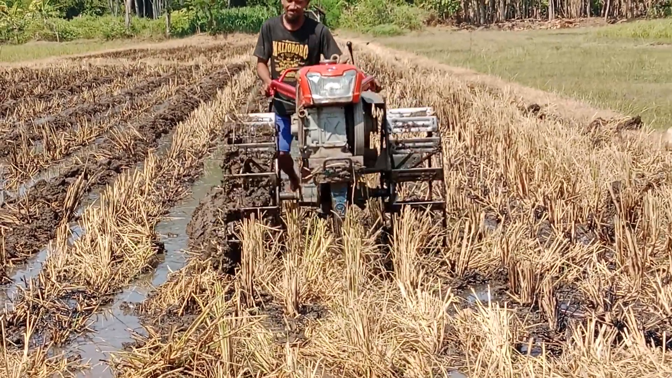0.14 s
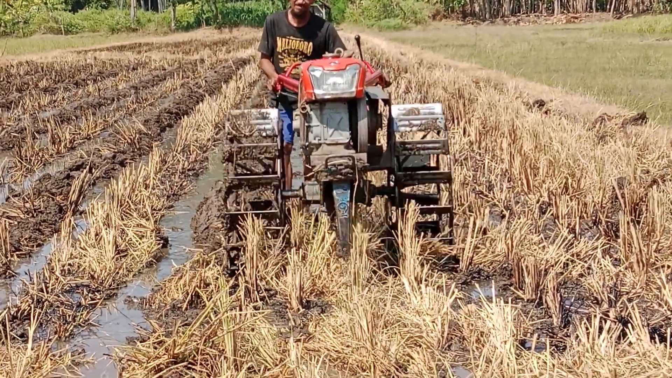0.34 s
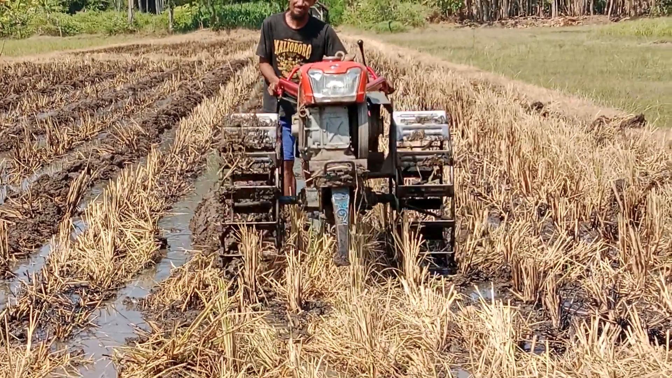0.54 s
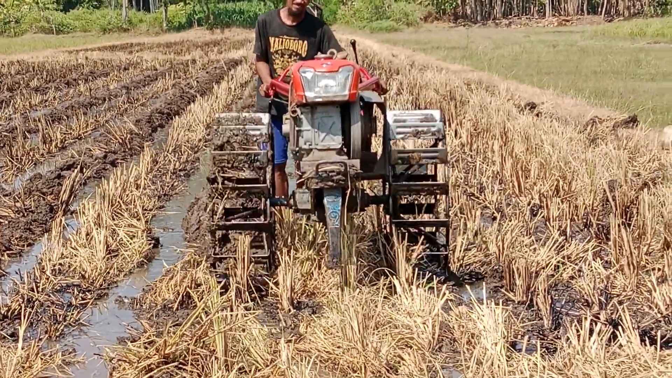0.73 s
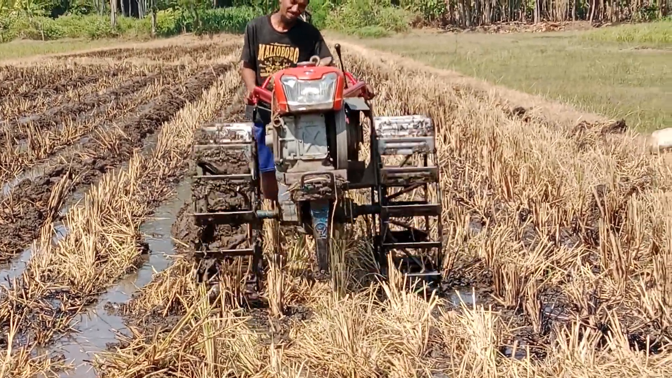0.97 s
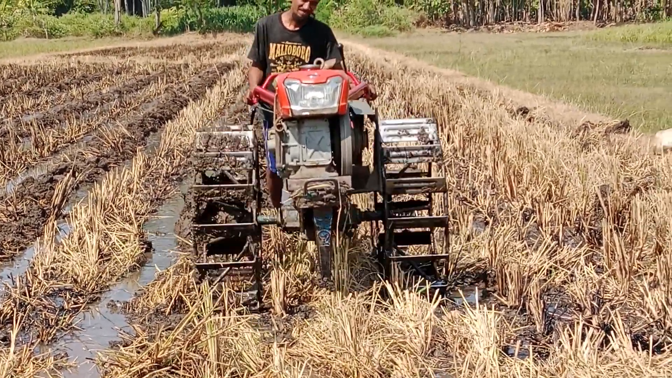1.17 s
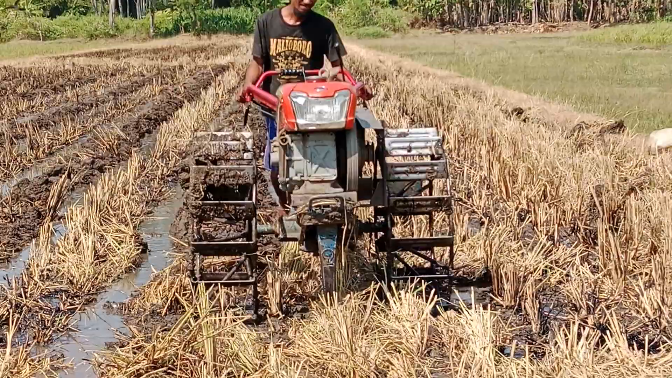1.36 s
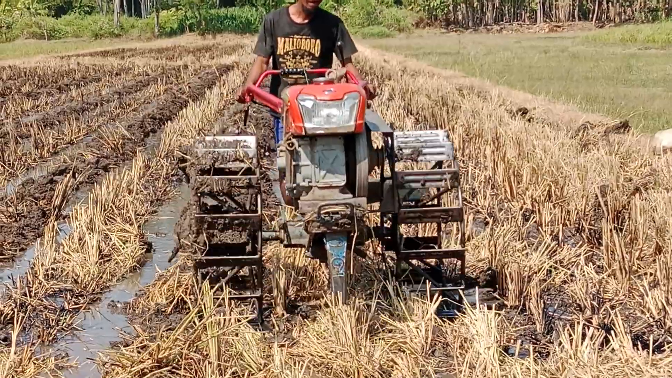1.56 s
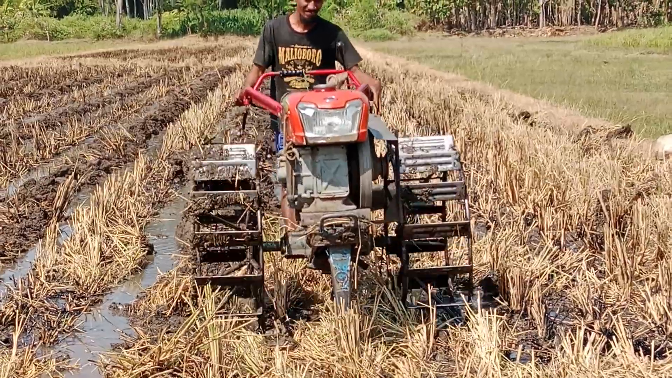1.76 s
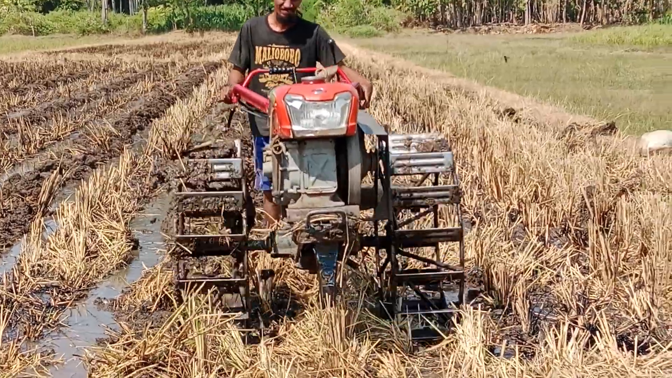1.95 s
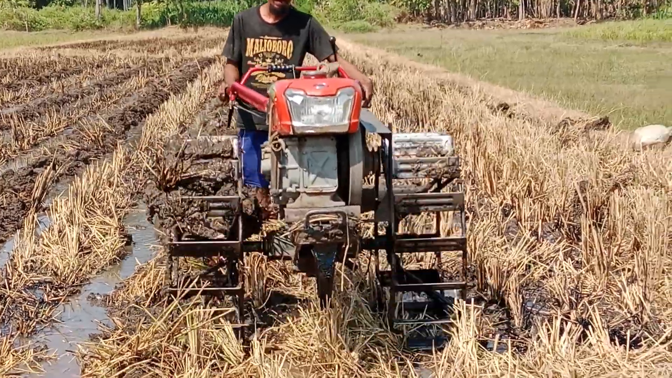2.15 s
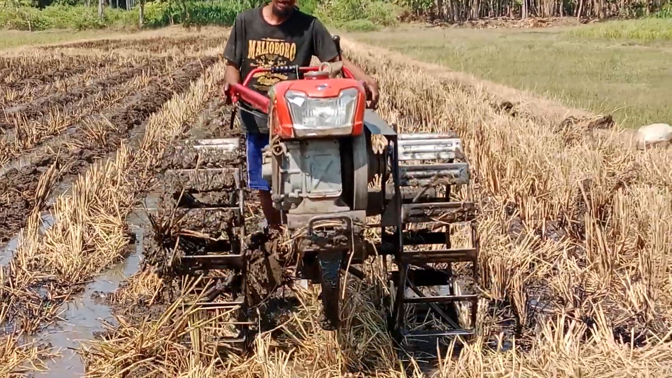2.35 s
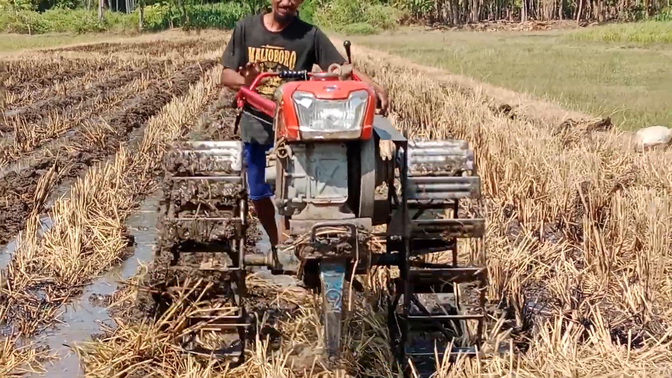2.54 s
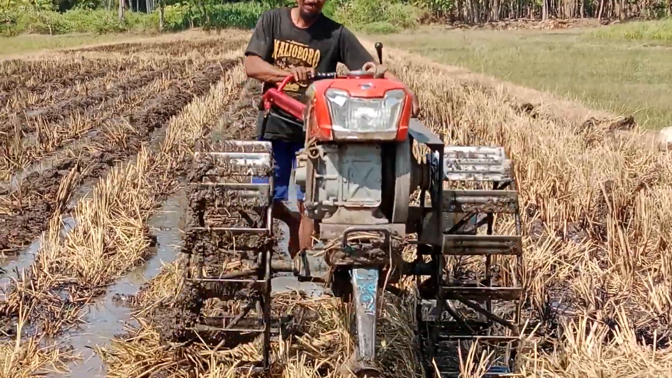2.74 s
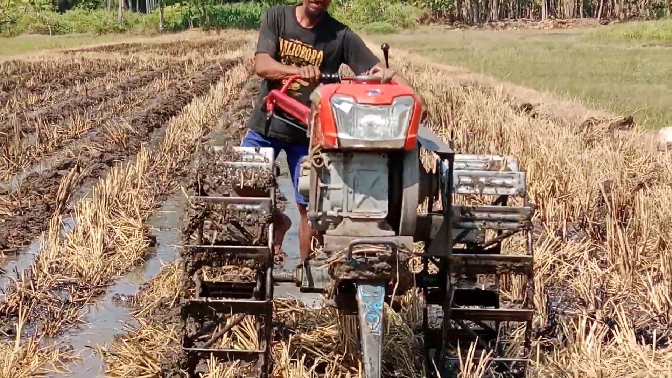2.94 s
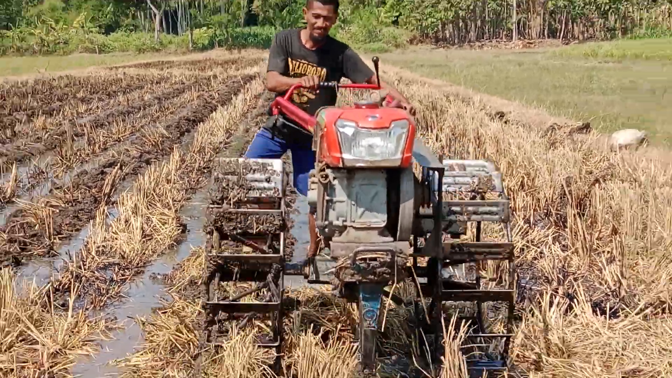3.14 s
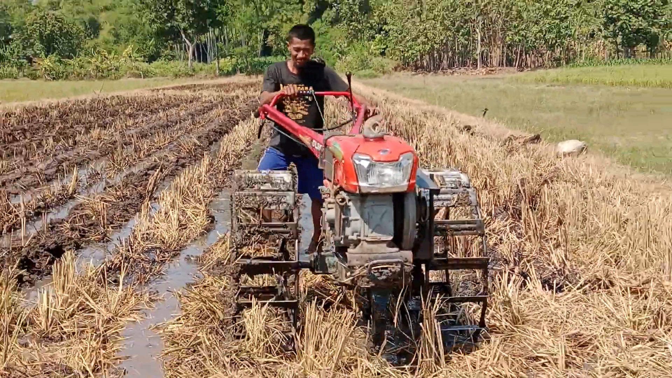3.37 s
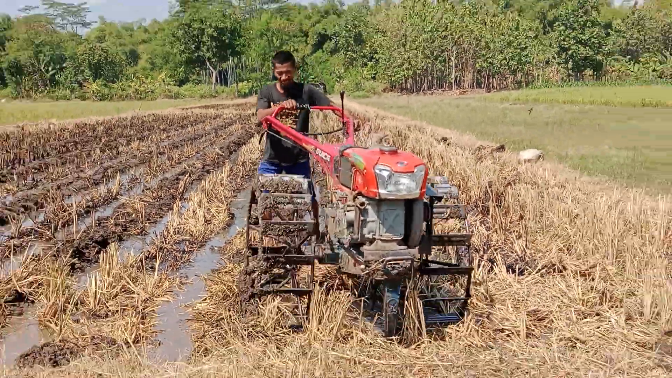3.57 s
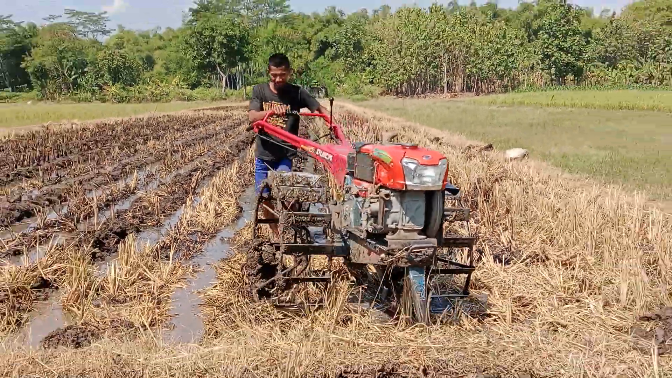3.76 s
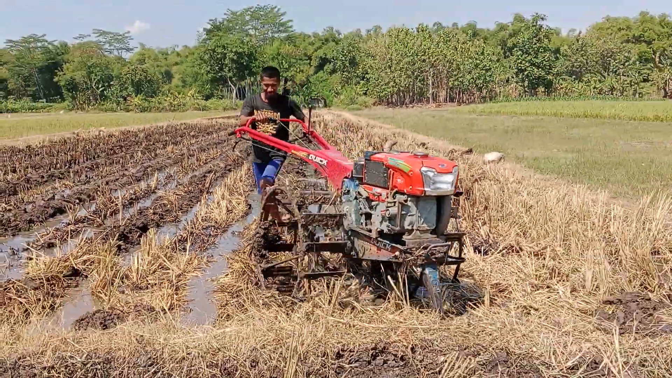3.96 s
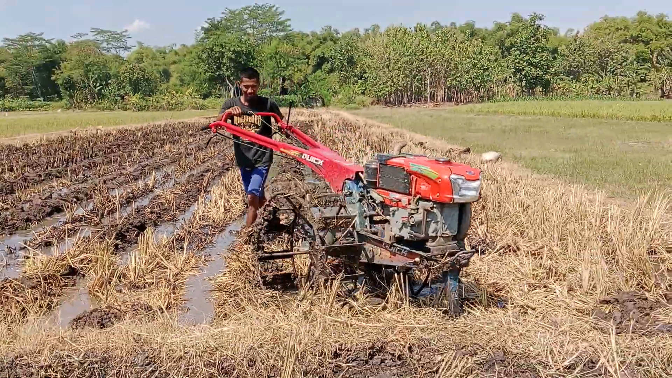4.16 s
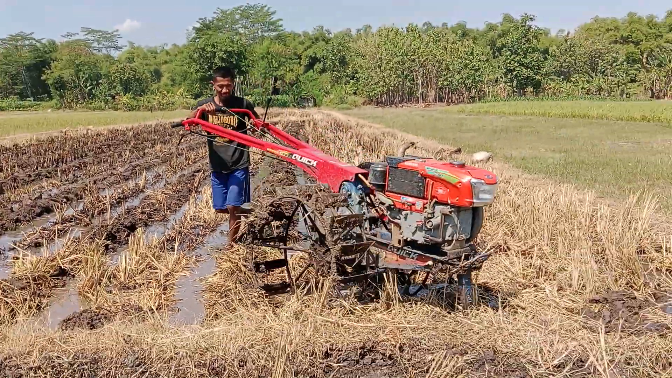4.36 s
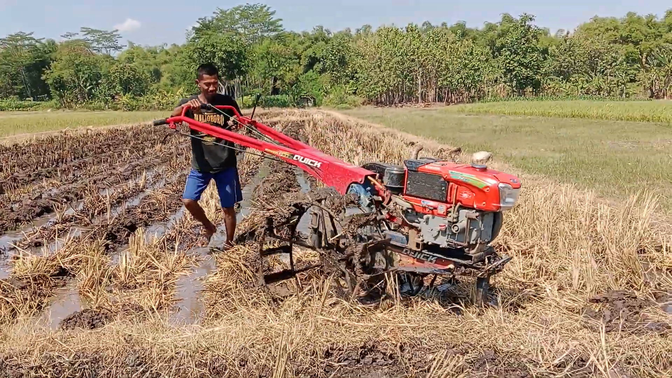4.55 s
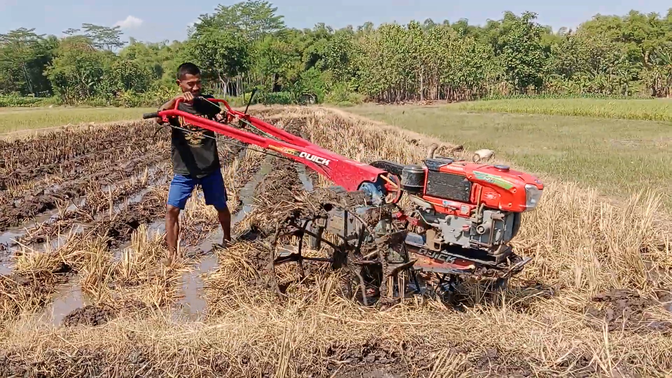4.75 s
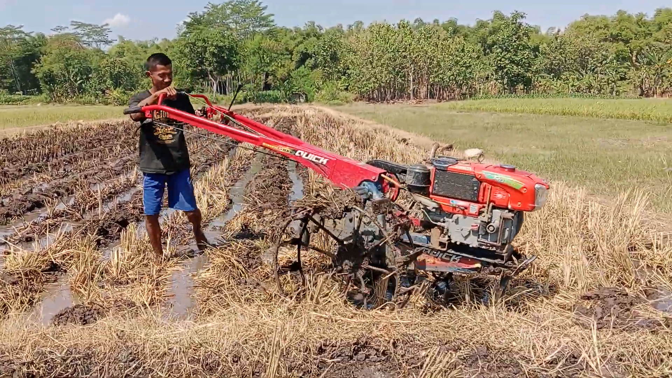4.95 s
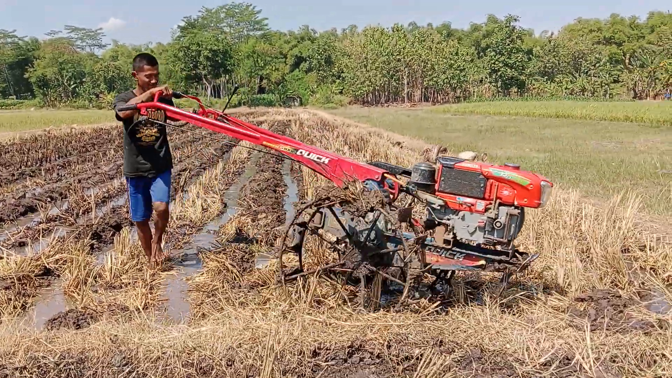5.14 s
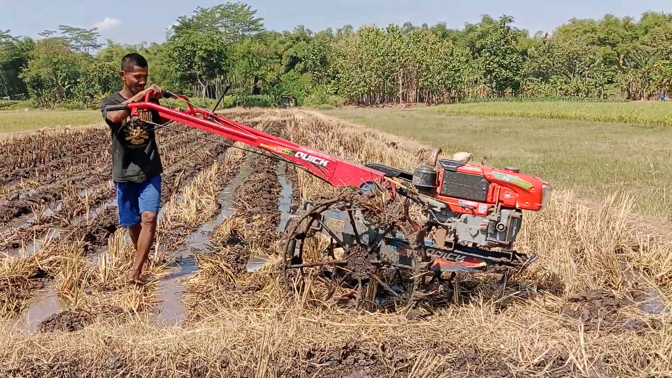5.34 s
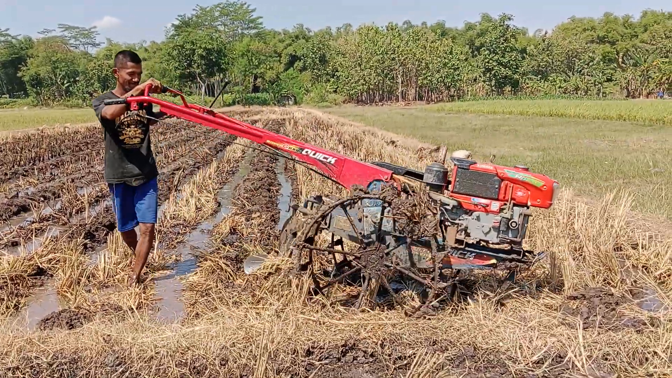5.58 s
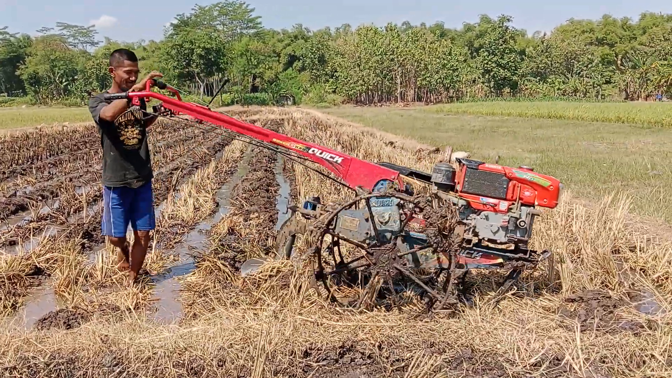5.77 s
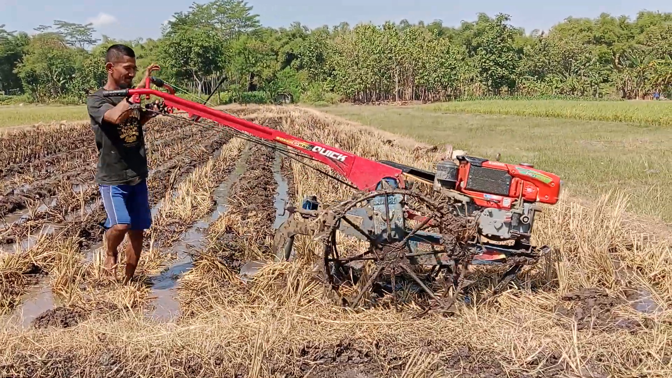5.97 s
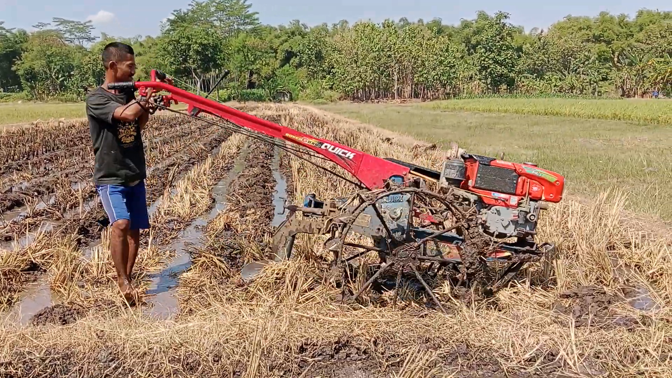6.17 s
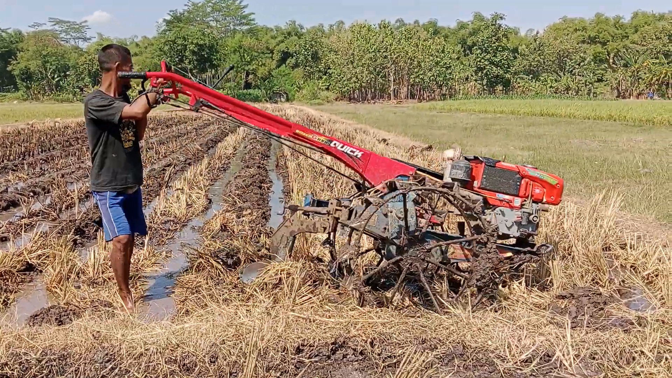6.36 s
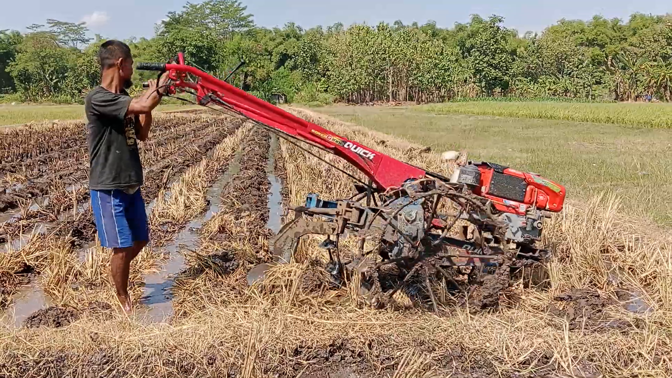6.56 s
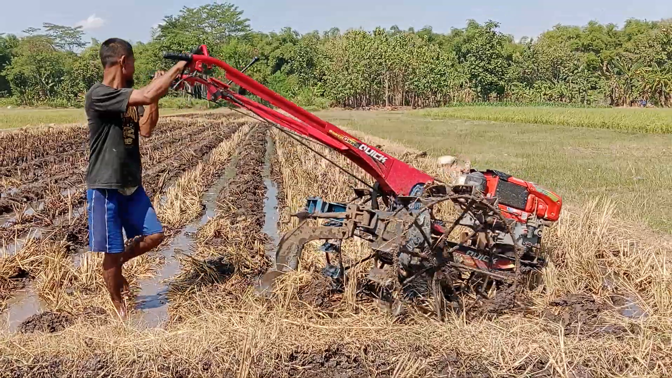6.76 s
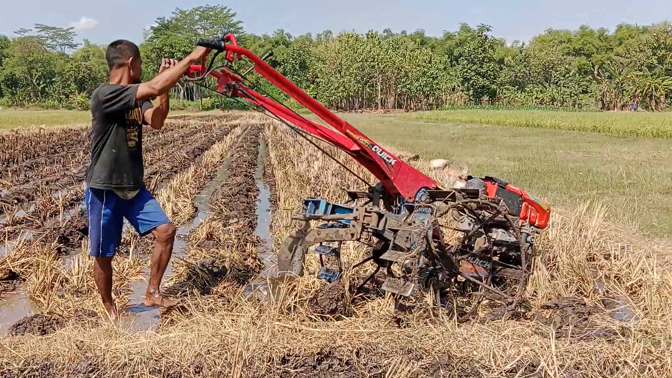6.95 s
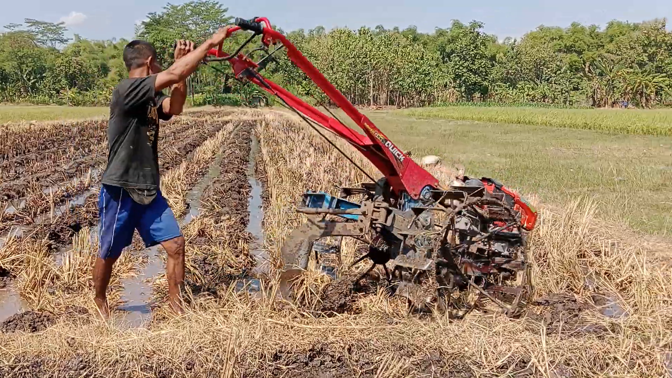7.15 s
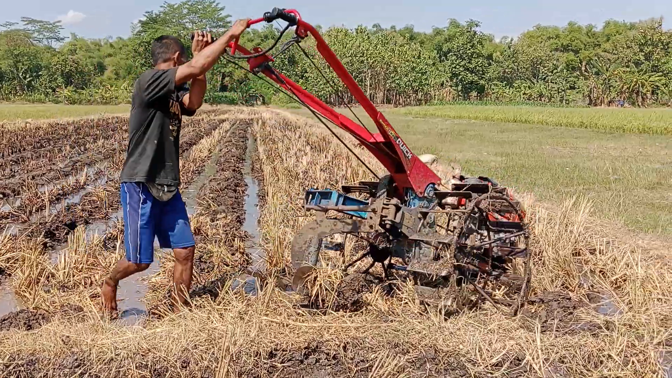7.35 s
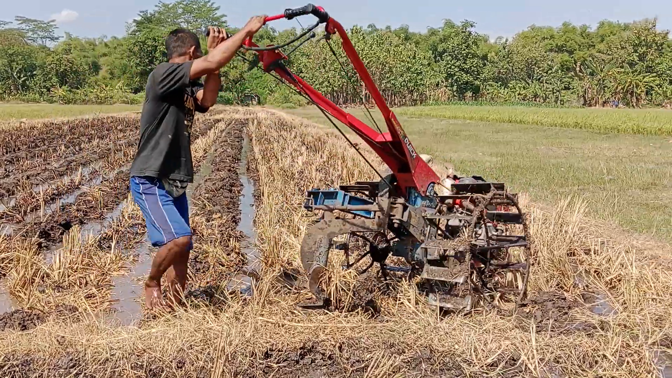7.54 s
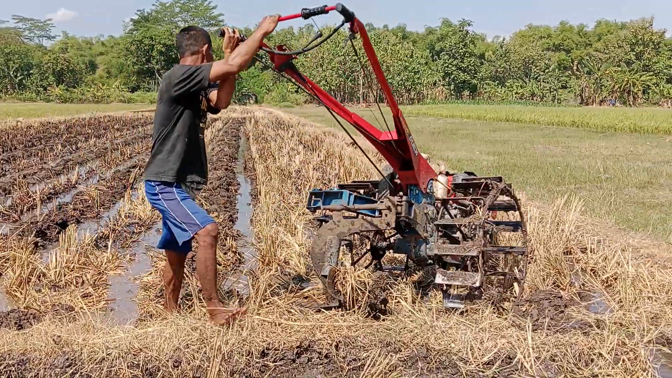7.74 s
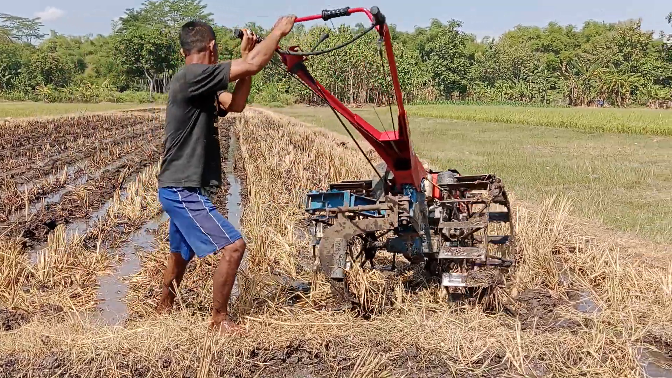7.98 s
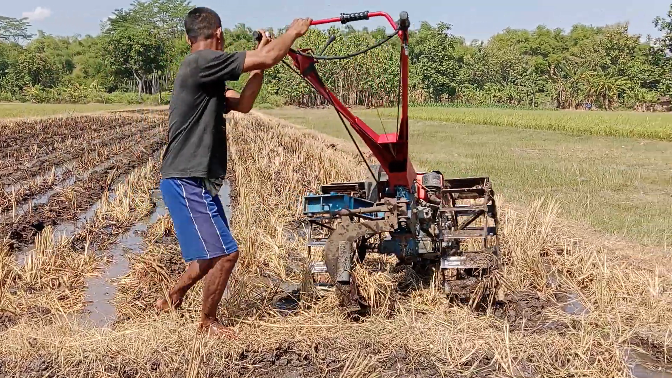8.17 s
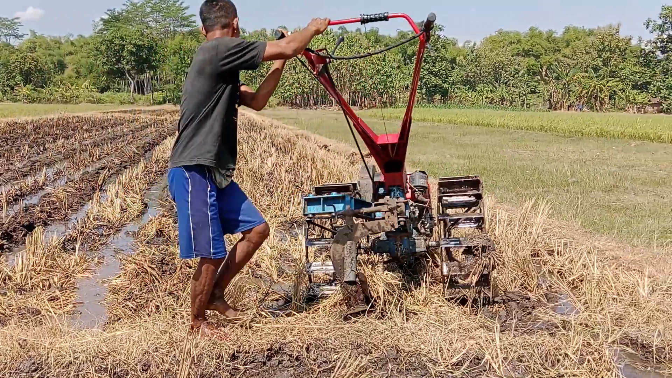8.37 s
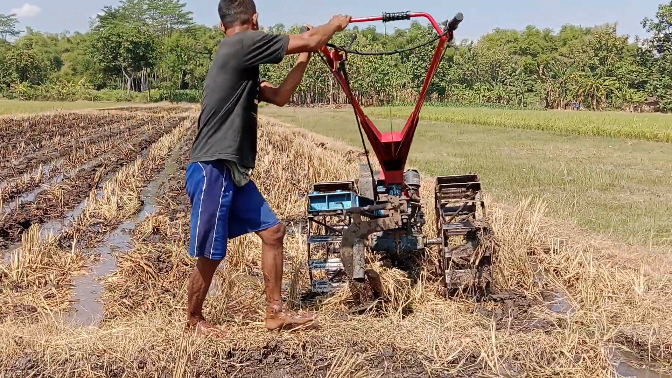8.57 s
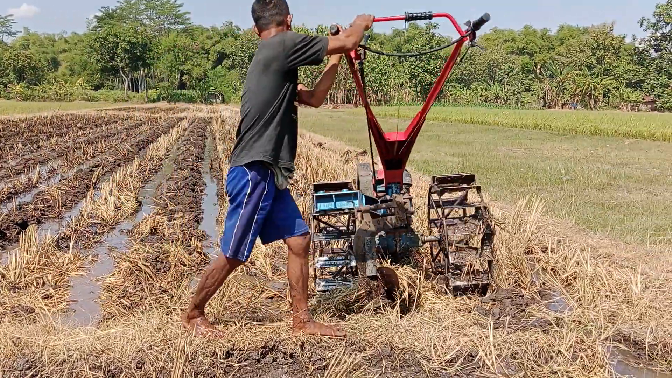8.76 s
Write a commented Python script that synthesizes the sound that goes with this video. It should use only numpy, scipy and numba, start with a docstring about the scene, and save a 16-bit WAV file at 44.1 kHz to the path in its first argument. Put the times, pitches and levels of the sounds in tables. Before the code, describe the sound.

Rapid diesel putting with hard metallic knocks swells toward the listener, then drops off into slow, loose idle thumps, rattling iron and faint mud spatter.

```python
"""A single-cylinder four-stroke diesel on a hand tractor ploughs nearer, is throttled back,
coasts down and turns away at idle. Each cycle sums noise-rung block knock, valve tick, band-passed
exhaust and inlet pulses. Gears tap and filtered noise rumbles below; sheet metal hisses,
mud sprays in the far treble, loose iron buzzes and the engine clanks."""
import sys
import numpy as np
from scipy import signal
from scipy.io import wavfile
from scipy.ndimage import uniform_filter1d
from numba import njit

SR = 44100
rng = np.random.default_rng(int(sys.argv[2]) if len(sys.argv) > 2 else 0)


def waveform_to_disk(signal):
    """Save audio, clipped to [-1, 1], as 16-bit WAV at the path in sys.argv[1]."""
    frames = np.transpose(np.atleast_2d(signal))
    scaled = np.clip(frames, -1, 1) * 32767
    samples = np.round(scaled).astype(np.int16)
    wavfile.write(sys.argv[1], SR, samples)


N = 388521
TIME_S = np.arange(N) / SR


def undb(db):
    """Amplitude of a level in dB."""
    return 10 ** (np.asarray(db) / 20)


def track(points, at):
    """Straight lines through (position, value) points, read at the given positions."""
    return np.interp(at, *np.transpose(points))


def band(x, hz, width_hz, order=2):
    """Resonance applied several times, so the valleys beside it stay dark."""
    b, a = signal.iirpeak(hz, hz / width_hz, fs=SR)
    for _ in range(order):
        x = signal.lfilter(b, a, x)
    return x


def hiss(hz, width_hz, envelope):
    """White noise under an envelope rings one resonance."""
    return band(envelope * rng.standard_normal(N), hz, width_hz, order=3)


def spikes(s, size):
    """Impulses at the given seconds; those outside the sound are dropped."""
    k, out = np.round(np.asarray(s) * SR).astype(int), np.zeros(N)
    inside = (k >= 0) & (k < N)
    np.add.at(out, k[inside], (size * np.ones(len(k)))[inside])
    return out


def fade(x, t60_s, rise_s):
    """Each impulse becomes a swell of the given rise time and an exponential tail."""
    tail_pole = np.exp(-np.log(1000) / (t60_s * SR))
    rise_pole = np.exp(-1 / (max(rise_s, 1e-4) * SR))
    tail = signal.lfilter([1], [1, -tail_pole], x)
    return signal.lfilter([1 - rise_pole], [1, -rise_pole], tail)


def walk(rate_hz):
    """Random levels held 1 / rate_hz s and slewed twice; spread near 1."""
    k = int(SR / rate_hz)
    steps = np.repeat(rng.standard_normal(N // k + 1), k)
    return 1.49 * uniform_filter1d(uniform_filter1d(steps, k), k)[:N]


def thump(s, db, hz, width_hz, push_ms):
    """A soft slug of gas rings a pipe or box; each ring peaks at db."""
    push = np.hanning(int(push_ms * SR / 1000))
    one = band(np.r_[push, np.zeros(SR // 10)], hz, width_hz)
    return signal.fftconvolve(spikes(s, undb(db)), one / np.abs(one).max())[:N]


def strokes():
    """Every power stroke: near steady under load, losing speed evenly, then uneven idle beats."""
    # crank position under load: stroke_number, exhaust_opens_s
    crank = [(-1, -.0731), (5, .519), (10, 1.0078), (13, 1.3062), (16, 1.5994), (25, 2.4856), (26, 2.5857),
             (31, 3.0766)]
    # working then coasting strokes: ignition_lead_ms, knock_db, exhaust_thump_db, valve_tick_db
    load = [(24.8, -33.0, -25.0, -34.0), (24.84, -36, -24, -33), (25.6, -33.5, -25.5, -31),
            (26.34, -31, -23, -32.5), (23.8, -35, -23, -30.5), (25.7, -33, -25, -30.5),
            (26.5, -29, -22.5, -27), (23.7, -30.5, -22, -28), (26.4, -33, -23.5, -37),
            (25.76, -34.5, -23.5, -33.5), (25.3, -37, -23.0, -32), (23.7, -32, -23, -37),
            (22.7, -30.5, -23, -33.5), (23.64, -28, -24, -29.5), (24.3, -31, -23.5, -31),
            (26, -27, -23, -29), (22.7, -34, -22.5, -32), (25.7, -32, -22.5, -33), (23.75, -27, -22.5, -33),
            (26.6, -32.5, -22.5, -30.5), (27.2, -28.5, -22, -27.5), (27, -31, -23, -39),
            (26.54, -25, -22.5, -31), (24.9, -26, -21.5, -28), (24.3, -29, -22, -23.5),
            (24.8, -31, -21.5, -33), (26.9, -30.5, -22.5, -25.5), (25, -20.5, -20, -28),
            (22.65, -19, -21, -24.8), (24.9, -21.5, -20, -24.5), (25.6, -26.5, -20, -26.5),
            (23.68, -26.5, -20.5, -24.5), (24.85, -26, -21, -38), (24.36, -22.5, -37, -31),
            (25.3, -50, -28, -53), (22.3, -35, -25, -44), (23.1, -47, -27, -38), (28, -44, -25.5, -48),
            (17.8, -32, -26, -36), (33.3, -32.7, -26, -45), (27.2, -28.5, -29.5, -32),
            (36.4, -30.1, -29, -35.8), (36.4, -30, -30, -37), (36.8, -32, -34, -53), (41, -34.5, -37, -35)]
    # idle beats: exhaust_opens_s, ignition_lead_ms, knock_db, exhaust_thump_db, valve_tick_db
    idle = [(4.6767, 55, -36, -40, -63), (4.84, 54, -29, -38, -35), (5.0101, 57, -31, -29.5, -40),
            (5.1852, 53, -26, -25.5, -22), (5.3592, 55, -26, -25, -32), (5.5317, 51, -31.5, -45, -64),
            (5.7139, 53, -27, -29, -27), (5.893, 53.6, -28.5, -27, -22.5), (6.0718, 55.4, -28, -25.5, -25),
            (6.246, 52, -31.5, -32, -32), (6.4254, 55, -22.5, -26, -24), (6.5932, 51.5, -33.5, -32, -26.5),
            (6.7702, 54, -36.5, -29.5, -27), (6.9426, 52.7, -27, -24, -22), (7.106, 46.6, -32.5, -32, -40),
            (7.277, 54, -31.5, -30, -48), (7.4447, 48, -33, -26.5, -34), (7.6106, 48, -37, -26.5, -31.5),
            (7.7825, 53, -36, -27, -31), (7.9534, 53, -36, -26.5, -32), (8.123, 54, -34.5, -29.5, -37),
            (8.2958, 52, -38.5, -27.5, -25.5), (8.4642, 51, -36, -33, -51), (8.64, 57, -49, -27.5, -30.5),
            (8.813, 63, -38, -36, -44)]
    rate_per_s, loss_per_s2, coast_strokes = 10.067, 2.379, 12
    number, s = np.transpose(crank)
    working = np.interp(np.arange(number[0], number[-1] + 1), number, s)
    turns = np.arange(1, coast_strokes + 1)
    # constant deceleration of the flywheel, solved for the time of each stroke
    coast_s = (rate_per_s - np.sqrt(rate_per_s ** 2 - 2 * loss_per_s2 * turns)) / loss_per_s2
    coasting = s[-1] + coast_s
    loaded = np.c_[np.r_[working, coasting], load]
    return np.transpose(np.r_[loaded, idle])


def since_ignition(fires):
    """Fraction of the cycle elapsed since the last ignition, 0-1."""
    return np.interp(TIME_S, fires, np.arange(len(fires))) % 1


def pipes(opens, cycle, thump_db, close_db, inlet_db):
    """Exhaust blow-down, the snap as that valve shuts a stroke later, then the inlet's ring."""
    # at working speed the gas leaves as a short steep front; slower, as a long soft one
    slow = np.clip((cycle - .1) / .006, 1e-3, 1 - 1e-3)
    fast_db = thump_db + 20 * np.log10(1 - slow)
    slow_db = thump_db + 20 * np.log10(slow)
    blow = thump(opens + .0075, fast_db + 3.3, hz=123, width_hz=76, push_ms=4.7)
    blow -= thump(opens + .001, fast_db + 1.7, hz=200, width_hz=147, push_ms=8.5)
    blow += thump(opens - .0056, slow_db - 1.5, hz=124, width_hz=36, push_ms=13.8)
    blow -= thump(opens - .0049, slow_db - 4.2, hz=106, width_hz=105, push_ms=12.3)
    # a weak low bump comes just before each exhaust thump
    blow += thump(opens - .005 - .006 * slow, thump_db - 14, hz=105, width_hz=200, push_ms=9)
    shuts = opens + .0095 + .178 * cycle - .0025 * slow
    shut = thump(shuts, close_db + 1 - 5 * slow, hz=260, width_hz=170, push_ms=3.8)
    tail = thump(shuts - .001, close_db - 15 + 13 * slow, hz=148, width_hz=38, push_ms=4)
    # the piston pumps air whether fuel burns or not, so the air cleaner hums on the overrun too
    hum = thump(shuts, inlet_db - 26 + 7 * slow, hz=145, width_hz=26, push_ms=2.9)
    draws = opens + .016 + .425 * cycle
    inlet = thump(draws, inlet_db, hz=152, width_hz=75, push_ms=3)
    inlet += thump(draws, inlet_db - 5, hz=156, width_hz=22, push_ms=3)
    return blow + shut + tail + hum + inlet


def breathing(opens, cycle, thump_db):
    """Exhaust and inlet gas; with little fuel burning it loses its deep bass."""
    # start_s, inlet_ring_db (as the inlet shuts), exhaust_closing_db; both before trims in pipes()
    intake = [(0, -30, -29), (1.5, -28.5, -27), (2.2, -27, -24.5), (3, -27.5, -25), (3.5, -30, -24.5),
              (3.72, -32.5, -36.5), (4.1, -36.5, -37), (4.5, -47.5, -40), (5.2, -58, -36.5),
              (5.7, -64, -37.5), (6.6, -66, -37.5), (7.4, -66, -37), (8.8, -66, -40.5)]
    # start_s, overrun_share (0-1)
    coast_share = [(3.1, 0.4), (3.4, 1), (4.5, 1), (4.95, 0.3)]
    s, inlet_db, close_db = np.transpose(intake)
    inlet_db = np.interp(opens, s, inlet_db)
    close_db = np.interp(opens, s, close_db) + 1.5 * rng.standard_normal(len(opens))
    gas = pipes(opens, cycle, thump_db, close_db, inlet_db)
    thin = signal.sosfiltfilt(signal.butter(2, 58, "high", fs=SR, output="sos"), gas)
    overrun = np.clip(track(coast_share, TIME_S), 0, 1)
    return gas + overrun * (thin - gas)


@njit
def wall(x, hz, width_hz, order):
    """Resonance whose centre moves, applied several times."""
    y = x.copy()
    for _ in range(order):
        b, l = 0., 0.  # band-pass and low-pass states
        for i in range(len(y)):
            g, k = np.tan(np.pi * hz[i] / SR), width_hz / hz[i]
            v = (b + g * (y[i] - l)) / (1 + g * (g + k))
            b, l, y[i] = 2 * v - b, l + 2 * g * v, k * v
    return y


def block(opens, cycle, lead_ms, knock_db, tick_db, clatter_db, side, shake):
    """Knock, valve tick and running clatter ring the same casting, each blow with its own colour."""
    # block and covers: centre_hz, width_hz (per filter pass), front_db, side_db,
    # knock_extra_front_db, knock_extra_side_db
    walls = [(277, 102, -4.5, -37, -29, 2), (515.4, 77, -15.5, -43, 7, 11), (630.6, 200, 0, -9, -9.5, -19),
             (792, 198, 0.5, 4.5, -17.5, -6), (1027, 290, -5, -14, -9.5, -7),
             (1248.7, 179, 0.5, -5, -4, 0.5), (1400, 238, -11, -13, 1, 12),
             (1724, 405, -18, -29, 13.5, 8.5), (2041, 380, -17, -14, -2, -1), (2299, 273, -4, -6, -4, -2),
             (2470, 300, -4, -9, -6.5, 2), (2670, 253, -11.5, -7, 6.5, -12),
             (2940, 520, -10, -15.5, 4.5, -1), (3407, 180, -11.5, -23, -7, -11),
             (3697, 370, -16, -43, -22, -5), (4010, 180, -21, -33, -2, -8),
             (4410, 590, -25.5, -50, -19, -2)]
    # walls the valve gear reaches best: centre_hz, tick_extra_db
    tick_colour = [(300, -10), (800, -12), (1300, -6.5), (1800, -2), (2350, 1.5), (2800, -22), (3500, 8),
                   (4500, 5)]
    # walls that fall silent soonest between slow strokes: centre_hz, lull_share (ratio)
    lull_depth = [(280, 1.7), (520, 1.8), (790, 1.04), (1030, 1.7), (1390, 1.7), (1720, 0.85), (2400, 0.47),
                  (3000, 1.8), (4400, 1.3)]
    clatter_rise_s, idle_swell_s = .03, .005
    wall_drift, wall_sag = .022, .03  # shares of the wall's centre frequency

    fires, lifts = opens - lead_ms / 1000, opens + .010 - .13 * cycle
    side_at_fire = np.interp(fires, TIME_S, side)
    # slow running leaves a lull before each ignition; the clatter then builds up again
    since = since_ignition(fires)
    lull = 138 * since ** 3.5 * np.interp(TIME_S, opens, cycle - .09)
    lull_db = fade(lull, clatter_rise_s, clatter_rise_s / 8) * np.log(1000) / (clatter_rise_s * SR)
    stroke = np.clip(np.searchsorted(fires, TIME_S) - 1, 0, None)
    out, flicker = 0, walk(45)
    for hz, width_hz, front_db, side_db, hit_front_db, hit_side_db in walls:
        hit_db = hit_front_db + side_at_fire * (hit_side_db - hit_front_db)
        run = undb(clatter_db - track(lull_depth, hz) * lull_db)
        knock_var, tick_var, knock_sign, tick_sign, delay_var = rng.standard_normal((5, len(opens)))
        knock = undb(knock_db + hit_db + 2.5 * knock_var)
        tick = undb(tick_db + 3 * tick_var + track(tick_colour, hz))
        # a blow is one sharp push, which reaches the low walls last, and a fading shiver after it
        late = 5.49 / hz
        # low walls shiver longer, so each stroke darkens as it fades
        ring_s = .13 * (hz / 1500) ** -.4
        wander = np.roll(flicker, rng.integers(N))
        reach = fires + .02 * (cycle - .04) * (np.abs(delay_var) - .4)
        knock_push = (.81 + .5 * side_at_fire) * knock * np.sign(knock_sign)
        push = spikes(reach + late + .003005 * side_at_fire, knock_push)
        push += spikes(lifts + late, .61 * tick * np.sign(tick_sign))
        # the push lasts a fraction of the wall's own cycle, so it does not click
        push = uniform_filter1d(push, size=int(.4 * SR / hz)) * 1.3
        knocks, ticks = spikes(reach, knock), spikes(lifts, tick)
        # seen from the side the shiver swells in; from the front it is brief and hard
        swelling = fade(knocks, ring_s, 1.2 * late + idle_swell_s) + fade(ticks, .72 * ring_s, .0028)
        brief = fade(knocks, .51 * ring_s, .73 * late) + fade(ticks, .78 * ring_s, .0026)
        shiver = 1.02 * side * swelling + (1 - side) * 1.16 * brief
        shiver = shiver + shake + .62 * run * undb(3.3 * wander)
        # timing gears and rockers tap near set crank angles, each wall answering differently
        angle = np.linspace(.12, .9, num=6) + .02 * rng.standard_normal((len(opens), 6))
        size = np.clip(rng.standard_normal(angle.shape), -2, 2)
        tap_s = fires[:, None] + cycle[:, None] * angle
        taps = run * spikes(tap_s.ravel(), .63 * size.ravel())
        # the casting is loaded differently on every stroke, and its ring sags as the pressure falls
        drift = wall_drift * rng.standard_normal(len(opens))[stroke]
        centre_hz = hz * (1 + drift - wall_sag * (since - .4) * side)
        centre_hz = uniform_filter1d(centre_hz, size=400)
        drive = shiver * rng.standard_normal(N) + np.sqrt(SR / width_hz) * (push + taps)
        gain = undb(front_db + side * (side_db - front_db))
        out = out + gain * wall(drive, centre_hz, float(width_hz), order=3)
    return undb(15) * out


def gas_spit(opens, cycle, lead_ms, knock_db, thump_db, side, shake):
    """Envelope of gas spitting as the valve lifts, with a share of each knock and of the loose iron."""
    side_at_open = np.interp(opens, TIME_S, side)
    front_db, side_db, scatter_db = -12, -22, 2
    spit_db = (knock_db + thump_db) / 2 + front_db + side_at_open * (side_db - front_db)
    spit_db = spit_db + scatter_db * rng.standard_normal(len(opens))
    lift = fade(spikes(opens + .01 - .13 * cycle, undb(spit_db + 3)), .029, .0058)
    knock = undb(knock_db - 28 + 5.9 * side_at_open)
    return lift + fade(spikes(opens - lead_ms / 1000, knock), .09, .0049) + undb(-11.5) * shake


def sheet_metal(spit, hiss_db, side):
    """Thin sheet metal and escaping gas: noise bands sing under the spits and a running hiss."""
    # centre_hz, width_hz (per filter pass), front_db, side_db, spit_extra_db
    sheets = [(5300, 400, -14, -26, 11), (5900, 600, -5, -21, 9), (6750, 850, -2, -2, 0),
              (7700, 1000, -8, -2, 0), (8500, 500, -15, -8, 0), (6493, 38, 11, -6, -8),
              (7443, 65, 1, -8, -3)]
    out, puffs_db = 0, 1.4 * side * walk(12)
    for hz, width_hz, front_db, side_db, hit_db in sheets:
        drive = undb(hit_db + 3.8 * walk(10)) * spit + undb(hiss_db + 2.3 * walk(30) + puffs_db)
        gain = undb(front_db + side * (side_db - front_db) + 12.5)
        out = out + gain * hiss(hz, width_hz, drive)
    return out


def mud_spray(spit, top_db):
    """Mud off the wheel paddles: splashes and droplets gate far-treble noise, along with the spits."""
    # mud thrown off a paddle: start_s, relative_level_db
    splashes = [(1.8003, -35), (1.9944, -37), (2.0507, -43), (2.1335, -32), (2.2827, -38), (2.5217, -36),
                (2.582, -44), (2.7846, -33), (3.3847, -35), (4.4937, -41), (5.384, -45), (5.419, -40),
                (5.522, -39), (5.885, -48), (5.9369, -43), (5.9653, -36), (6.1229, -44), (7.3197, -49),
                (7.6445, -47), (7.6804, -40), (7.8206, -52), (8.0376, -43), (8.5045, -52), (3.72, -44),
                (3.83, -44), (3.94, -45), (6.5031, -38), (6.787, -35), (6.9361, -38)]
    # far-treble colour of the microphone: centre_hz, width_hz (per filter pass), relative_level_db
    port = [(9590, 3250, -6.5), (10800, 310, -11), (13750, 3700, -11.5), (15270, 1100, -0.5)]
    s, db = np.transpose(splashes)
    spray = fade(spikes(s, undb(db - 8.5)), .063, .003)
    spray = spray + undb(-6) * spit * undb(2 * walk(8.5)) + undb(top_db + 2.2 * walk(11))
    # single droplets tick between the splashes, 60 per s
    place, chance = rng.random((2, int(60 * N / SR)))
    drops = fade(spikes(place * N / SR, -np.log(chance)), .018, .0017)
    spray = spray + undb(top_db + 8.5) * drops
    out = 0
    for hz, width_hz, db in port:
        out = out + undb(db + 9.5) * hiss(hz, width_hz, spray * undb(2.8 * walk(30)))
    return out


def rumble(clatter_db, lull_db, side):
    """Low noise around 137 Hz follows the clatter, weaker from the side and before slow ignitions."""
    level = undb(clatter_db + 9.5 - 5.2 * side - 1.5 * lull_db)
    return level * hiss(136.7, 85, undb(3 * walk(3.554)))


def low_noise():
    """Uneven noise bands: low-mid, bass with the thuds of a wheel on clods, and a deep rumble."""
    # low-mid noise around 479 Hz, strongest when the tractor is nearest: start_s, relative_level_db
    low_mid = [(0, -74), (1.3, -49), (2.1, -39.5), (2.7, -38), (3.15, -36), (3.3, -42), (3.6, -55),
               (4.298, -72)]
    # low noise: start_s, bass_relative_db (269 Hz), deep_relative_db (40 Hz background rumble)
    low_levels = [(0.0, -37, -59), (2.94, -42, -61), (3.11, -40, -66), (3.65, -51, -66), (4.8, -82, -86),
                  (5.24, -62, -69), (5.46, -58, -80), (6.52, -68, -70), (7.06, -70, -76), (7.82, -57, -74),
                  (8.26, -69, -75), (8.8, -62, -79)]
    # a wheel drops on a clod: start_s, relative_level_db, length_s
    thuds = [(5.15, -37, 0.074), (6.7, -39, 0.069), (6.215, -47.5, 0.054), (4.6, -57, 0.038)]
    s, bass_db, deep_db = np.transpose(low_levels)
    thud = 0
    for start_s, db, length_s in thuds:
        thud = thud + undb(db) * np.sin(np.pi * np.clip((TIME_S - start_s) / length_s, 0, 1))
    mid = hiss(479, 170, undb(track(low_mid, TIME_S) + 12.5 + 4.35 * walk(20)))
    bass = hiss(269, 142, undb(np.interp(TIME_S, s, bass_db) + 13.5 + 3.84 * walk(14)))
    deep = hiss(40, 45, undb(np.interp(TIME_S, s, deep_db) + 30 + 2.8 * walk(12)))
    return mid + bass + undb(22.5) * hiss(216, 103, thud) + deep


def clanks():
    """Clanks and knock rings of the engine, each an impulse ringing one resonance."""
    # start_s, pitch_hz, peak_db
    struck = [(6.885, 3200, -35), (5.708, 3370, -38), (6.94, 3550, -37.5), (8.29, 2800, -54),
              (.428, 2400, -26), (3.698, 1310, -30.5), (3.939, 1283, -26.5), (4.062, 1370, -36),
              (2.788, 2425, -23.5), (4.661, 807, -27.5), (4.862, 805, -31), (4.902, 816, -31.5),
              (5.071, 800, -30), (5.247, 800, -29), (5.415, 790, -38), (5.598, 790, -30),
              (5.874, 670, -30.5), (5.913, 850, -25.5), (6.577, 790, -36), (7.329, 787, -38),
              (7.464, 770, -35), (7.802, 810, -41), (8.013, 770, -48), (8.182, 2330, -38.5),
              (7.70, 2670, -45), (0.815, 2410, -29), (1.507, 2280, -37), (7.576, 1310, -35),
              (7.908, 1376, -40), (8.08, 1400, -37), (8.423, 1406, -39), (8.77, 1350, -40),
              (3.163, 1220, -19.5)]
    out = np.zeros(N)
    for s, hz, db in struck:
        ring = band(np.r_[1, np.zeros(SR // 10)], hz, 143, order=3)
        padded = np.pad(undb(db) * ring / np.abs(ring).max(), (0, N))
        out += np.roll(padded, int(s * SR))[:N]
    return out


def shaking():
    """Envelope of loose iron buzzing for a moment."""
    # start_s, relative_level_db, length_s
    rattles = [(3.16, -28.5, 0.037), (6.39, -33.5, 0.019), (5.955, -33, 0.012), (3.3, -39, 0.0084),
               (6.5, -44, 0.0083), (13, -50, 0.095), (4.5, -44, 0.0086), (4.3, -45, 0.013),
               (2.9, -37, 0.01)]
    out = 0
    for s, db, length_s in rattles:
        gate = 1. * ((TIME_S > s) & (TIME_S < s + length_s))
        out = out + undb(db) * fade(gate, .023, .0004) * np.log(1000) / (.034 * SR)
    return out


def scene():
    """Sums the engine, the low noise and the mud along one course of work, coasting and idle."""
    # start_s, clatter_db, hiss_db, spray_db (all before trims), side_share (0 front, 1 side)
    work = [(0, -39.5, -56.5, -75, 0.04), (1.1, -38, -56, -71.5, 0), (1.9, -36, -54.5, -71.5, 0),
            (2.2, -32.5, -50.5, -69, 0.01), (2.6, -30.5, -48.5, -62, 0.16), (3.15, -31, -49, -76, 0.19),
            (3.62, -34.5, -53, -78, 0.44), (3.87, -34, -48.5, -65, 0.4), (4.3, -33.5, -56.5, -85, 0.54),
            (4.55, -37.5, -58, -89, 0.48), (5, -34, -58, -72, 0.48), (5.22, -35, -53, -75, 0.79),
            (5.4, -34.5, -53, -71, 0.41), (5.7, -36.5, -55, -75, 0.96), (5.999, -35.5, -53, -70, 0.71),
            (6.4, -35.5, -54, -76, 0.84), (7, -39, -52, -61, 0.72), (7.27, -40.5, -59, -82, 0.62),
            (7.5, -42.5, -57.5, -70, 1), (8.12, -41, -57, -68.5, 0.97), (8.44, -47, -64.5, -82, 1),
            (8.68, -38, -53, -63, 0.93)]
    s, *columns = np.transpose(work)
    clatter_db, hiss_db, top_db, side = (np.interp(TIME_S, s, c) for c in columns)
    side = np.clip(side, 0, 1)
    opens, lead_ms, knock_db, thump_db, tick_db = strokes()
    cycle = np.gradient(opens)
    # the hiss dips before each ignition, more the longer the cycle
    since = since_ignition(opens - lead_ms / 1000)
    lull_db = 99 * since ** 4.7 * np.interp(TIME_S, opens, cycle - .09)
    shake = shaking()
    spit = gas_spit(opens, cycle, lead_ms, knock_db, thump_db, side, shake)
    engine = breathing(opens, cycle, thump_db)
    engine = engine + block(opens, cycle, lead_ms, knock_db, tick_db, clatter_db, side, shake)
    treble = sheet_metal(spit, hiss_db - lull_db, side) + mud_spray(spit, top_db - lull_db)
    mix = engine + treble + rumble(clatter_db, lull_db, side) + low_noise() + clanks()
    return mix[None]


def record(dry):
    """The microphone loses the deepest bass, its port has two dips; a steep low-pass cuts the top."""
    # dips of the microphone port: centre_hz, width_hz
    port_dips = [(4850, 340), (9300, 3450)]
    dry = signal.sosfilt(signal.butter(1, 25, "high", fs=SR, output="sos"), dry)
    for hz, width_hz in port_dips:
        notched = signal.lfilter(*signal.iirnotch(hz, hz / width_hz, fs=SR), dry)
        dry = .22 * dry + .78 * notched
    return signal.sosfilt(signal.ellip(14, .2, 60, 15830, fs=SR, output="sos"), dry)


dry = scene()
out = record(dry)
waveform_to_disk(out)
```